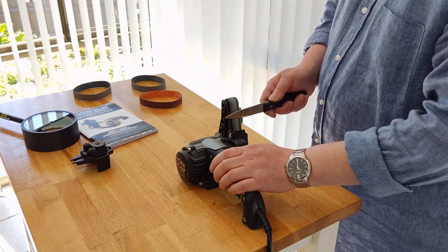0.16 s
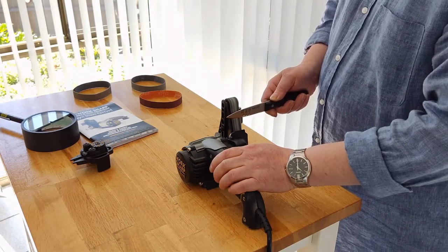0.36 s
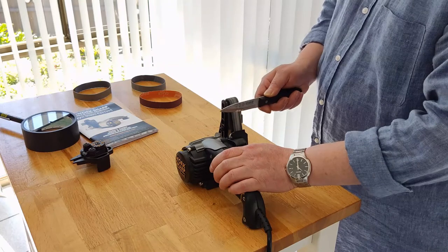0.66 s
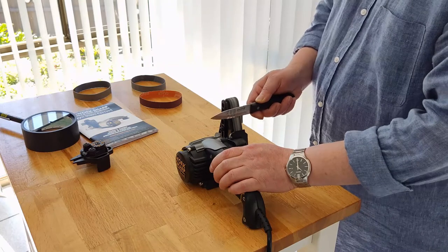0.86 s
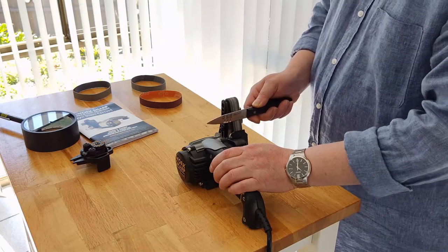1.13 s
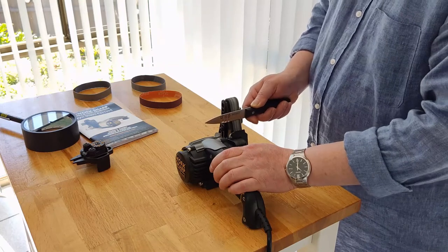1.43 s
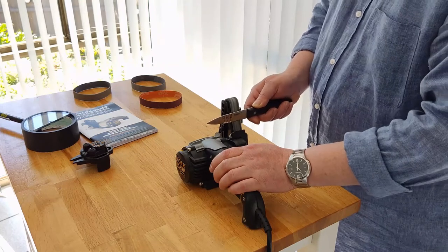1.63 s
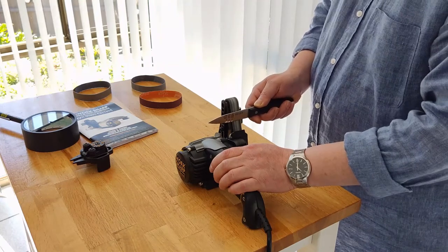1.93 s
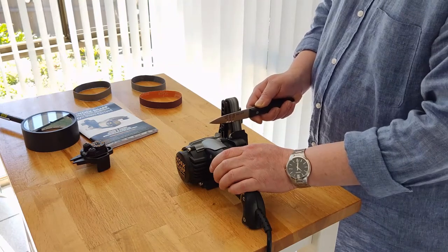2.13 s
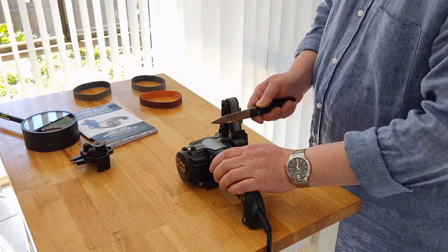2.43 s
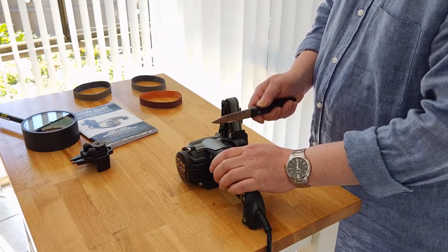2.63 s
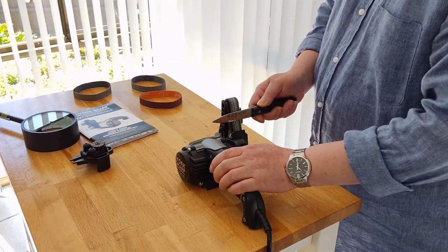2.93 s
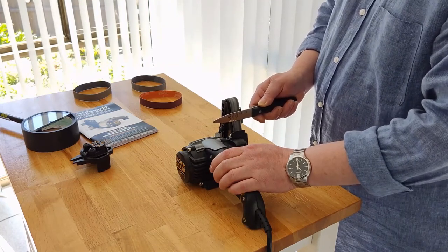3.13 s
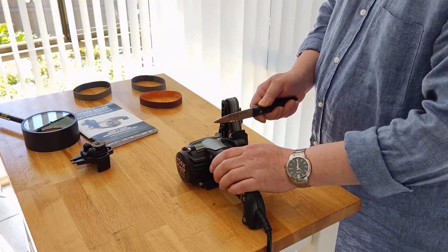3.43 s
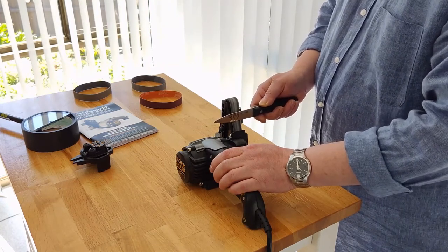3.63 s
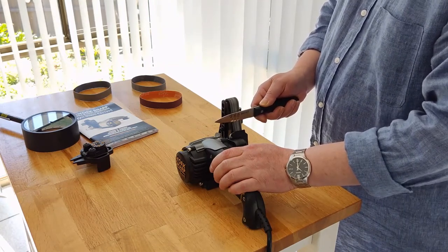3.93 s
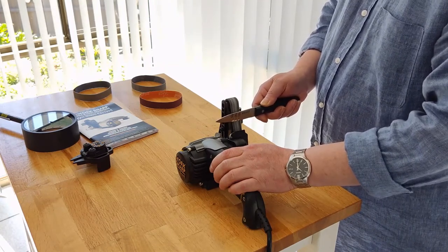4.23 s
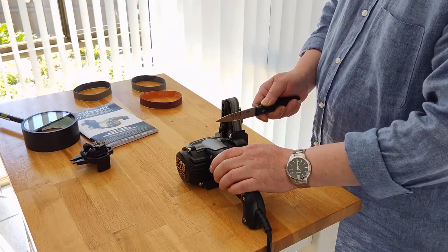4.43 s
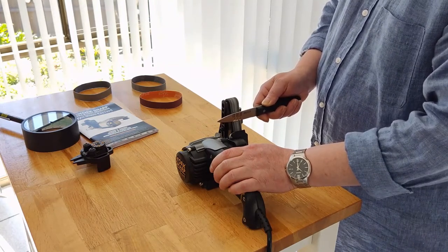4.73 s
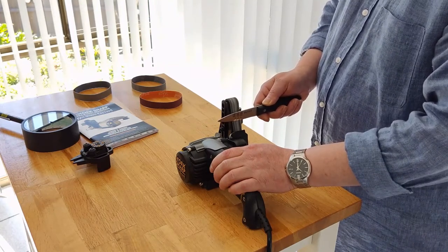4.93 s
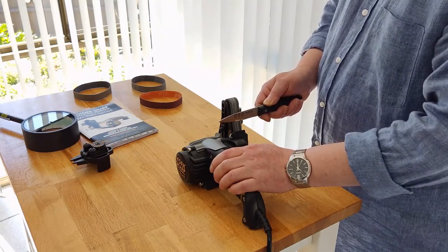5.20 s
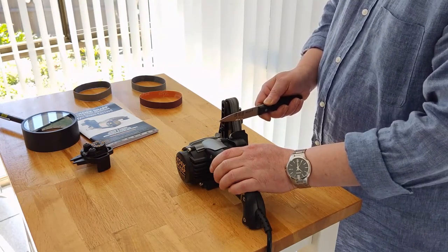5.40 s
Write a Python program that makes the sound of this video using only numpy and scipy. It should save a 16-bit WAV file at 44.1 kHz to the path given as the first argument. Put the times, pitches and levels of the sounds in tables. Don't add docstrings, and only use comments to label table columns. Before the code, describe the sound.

A steady low motor hum with a buzzing rattle and thin gear whine runs throughout. Over it, sizzling metallic grinding flutters rapidly with each turn of the belt, stops for a little over half a second, then returns in one long, slightly wavering stroke. Near, dry stereo sound from a small camera on an indoor table.

```python
import sys
import numpy as np
from scipy import signal
from scipy.io import wavfile
from scipy.ndimage import uniform_filter1d, map_coordinates

SR = 44100
rng = np.random.default_rng(int(sys.argv[2]) if len(sys.argv) > 2 else 0)


def gain_from_db(level_db):
    decades = np.asarray(level_db, float) / 20
    return 10 ** decades


def inscribe(sig):
    pcm = np.round(np.clip(np.atleast_2d(sig).T, -1, 1) * 32767)
    wavfile.write(sys.argv[1], SR, pcm.astype(np.int16))


N = 245195
T = np.arange(N) / SR
LAPS_PER_S, START_LAP = 25.321, .0277
KNOCK = .42

# [t/s, duration/s, gained belt rate/(laps per s), gained shaft f/Hz, gained gear f/Hz]
DRAG = [
    (.5, .1, .222, .2, 2),
    (1.3, .38, -.212, -1.5, -2),
    (4.33, .22, -.124, -1.35, -19),
]
# [f/Hz, left minus right level/dB, likeness (0-1)]
PORTS = [(5000, -1, 0), (6230, -3, 0.03), (7000, -3, 1), (8600, -12, 0.77), (9700, -0.5, 1),
         (11000, 16, 0.17), (12500, 8.5, 0.5), (14200, 11.5, .2)]


def grinding():
    # [f/Hz, spectral level/(dB per Hz)]
    grind_spectrum = [(2650, -53), (4580, -28), (5000, -27), (5690, -24), (6140, -19), (6660, -23.5),
                      (7220, -10), (7760, -10), (8180, -3), (9000, -2.5), (10100, -5.5), (11200, -4.5),
                      (12600, -18.5), (14100, -20)]
    # [f/Hz, bandwidth/Hz, level above the hiss/dB]
    blade_modes = [(8380, 35, 5.5), (8830, 50, 2.5), (9000, 40, 5.5), (9080, 40, 3), (9295, 50, 5),
                   (9860, 70, 3), (10270, 40, 3.5), (10570, 70, 3), (10800, 70, 2), (11100, 40, 6),
                   (11400, 35, 4.5), (6290, 80, 3)]
    # [place in the lap (0-1), width/laps, level/dB]
    grind_spots = [(0.05, 0.022, 1.1), (0.55, 0.017, 5.5), (0.605, 0.034, 1.0), (0.655, 0.031, 2.1),
                   (0.72, 0.018, 6.6), (0.775, 0.034, 4.7), (0.84, 0.044, 5.6), (0.93, 0.019, 1.6),
                   (0.965, 0.012, 1.9)]
    pressure, bright_db = hand()
    bite = grit(grind_spots, 1.3, luck_db=1.6, swell_db=.2, fine_db=1.15, most_db=8)
    sound = hiss(pressure * bite, grind_spectrum, PORTS, size=2048, patchy_db=1.8,
                 modes=blade_modes, fickle=.45)

    treble_filter = signal.butter(2, 10100, "high", fs=SR, output="sos")
    treble = signal.sosfiltfilt(treble_filter, sound)
    body = sound - treble
    fizz_filter = signal.butter(4, 12400, "high", fs=SR, output="sos")
    fizz = signal.sosfiltfilt(fizz_filter, treble)
    treble = treble + fizz * (gain_from_db(4.2 * drift(23.85)) - 1)

    rock_db, tremor_db = 1, -0.4
    bright_db = bright_db + rock_db * drift(13)
    tilted = treble * gain_from_db(bright_db / 2) + body / gain_from_db(bright_db / 2)
    return gain_from_db(tremor_db * drift(7)) * tilted


def hand():
    # [touch t/s, lift t/s, grinding level/dB, brightness/dB]
    strokes = [
        (-.6, 0.49, -16.5, 4.5),
        (1.18, 6, -16, 0.9),
    ]
    # [t/s, width/s, level/dB, brightness/dB]
    wavers = [(.3, .16, -2, -6), (.41, .06, -0.5, 10), (1.43, .07, 2, 1), (2.17, 0.094, -1.5, -5),
              (2.75, 0.078, -2, -4), (3.0, 0.25, .5, 5), (3.27, .09, -2.5, -2), (3.45, .1, .5, 3),
              (3.97, .14, -0.1, 0), (4.24, 0.065, .6, 1), (4.72, 0.11, -1.5, -4), (5.4, 0.84, 1.8, 0.5)]
    touch_s, first_bite_db, bear_s, lift_db_per_s = 0.032, -6, 0.23, 220
    ease_db_per_s, dull_db_per_s = 0.68, 0.36

    pressure, bright_db, waver_db = np.zeros(N), np.zeros(N), 0
    for at, width, db, tilt_db in wavers:
        bump = np.exp(-4 * np.log(2) * ((T - at) / width) ** 2)
        waver_db = waver_db + db * bump
        bright_db = bright_db + tilt_db * bump
    for touch, lift, db, tilt_db in strokes:
        since = np.maximum(T - touch, 0)
        db = db + first_bite_db * np.exp(-since / bear_s) - ease_db_per_s * since
        db = db - lift_db_per_s * np.maximum(T - lift, 0)
        pressure += np.minimum(since / touch_s, 1) * gain_from_db(db)
        near_belt = (T > touch) * (T < lift + .3)
        bright_db += (tilt_db - dull_db_per_s * since) * near_belt
    return pressure * gain_from_db(waver_db), bright_db


def grit(spots, depth, luck_db, swell_db, fine_db, most_db):
    lap, place = np.divmod(START_LAP + turns(LAPS_PER_S, axis=2), 1)
    luck = rng.standard_normal((int(lap[-1]) + 1, len(spots)))
    db = swell_db * np.cos(2 * np.pi * (place - .84))
    for k, (at, width, spot_db) in enumerate(spots):
        bite_db = depth * spot_db + luck_db * luck[lap.astype(int), k]
        db = db + bite_db * np.exp(-4 * np.log(2) * ((place - at) / width) ** 2)
    fine_grit = uniform_filter1d(uniform_filter1d(rng.standard_normal(N), 24), 24)
    db = db + fine_db * evened(fine_grit)
    return evened(gain_from_db(most_db * np.tanh(db / most_db)))


def free_belt():
    # [f/Hz, spectral level/(dB per Hz)]
    free_spectrum = [(2650, -32.5), (4580, -10), (4880, -17.5), (6030, -15.5), (6200, -5.5), (6600, -8),
                     (7030, -2), (7230, -10), (7620, -2.5), (8760, 4.5), (10100, -2), (11200, 3),
                     (14200, -14.5)]
    # [place in the lap (0-1), width/laps, level/dB]
    free_spots = [(0.225, 0.042, 3.0), (0.265, 0.009, 1.4), (0.31, 0.02, 5.5), (0.39, 0.017, 1.5),
                  (0.46, 0.012, 2.4), (0.54, 0.022, 3.1), (0.57, 0.015, 2.3), (0.76, 0.036, 1.7),
                  (0.84, 0.043, 2.9)]
    bite = grit(free_spots, .9, luck_db=1.5, swell_db=.3, fine_db=1.2, most_db=6)
    return gain_from_db(-26.5) * hiss(bite, free_spectrum, PORTS, patchy_db=.6)


def belt_joint():
    # [multiple of the lap rate, level midway/dB, creep/(dB per s)]
    joint_tones = [(11, -68, 0), (12, -64, -.8), (16, -66.5, 0), (19, -53, 1.1), (20, -62, .4),
                   (22, -57.5, 0), (23, -59.5, 0), (24, -66, .4), (25, -53, -.6), (26, -55, -.6),
                   (27, -47.2, .5), (29, -58.5, .6), (30, -53.5, 0), (31, -47.5, .2), (33, -46.3, .6),
                   (34, -43.5, -.6), (35, -51.5, .8), (36, -51, -.3), (37, -54, 1.2), (39, -59.5, 1.9),
                   (41, -54, 0), (48, -62, -.4), (51, -63, 2.4), (54, -63, .8), (56, -60, 2.4)]
    since_knock = START_LAP + turns(LAPS_PER_S, axis=2) - KNOCK
    return sum(tone(k * since_knock, joint_db(k, db, creep_db) + .7, .015, 1, apart=.0024 * k, scatter=.62)
               for k, db, creep_db in joint_tones)


def joint_db(multiple, db, creep_db):
    # [multiple of the lap rate, t/s, level step/dB]
    shifts = [
        (26, .5, -10),
        (25, 1.3, -8),
        (23, 4.33, 8),
    ]
    steps_db = sum(step_db * np.clip((T - at) / .15, 0, 1) for k, at, step_db in shifts if k == multiple)
    midway_s = 2.8
    return db + creep_db * (T - midway_s) + steps_db


def shaft_and_gear():
    # [multiple of the shaft rate, level/dB, phase wander/turns]
    shaft_tones = [(1, -53.5, 0.014), (2, -58.5, 0.036)]
    # [multiple of the mesh rate, level/dB, phase wander/turns]
    gear_tones = [(1, -46.8, .17), (2, -53, .2)]
    shaft_turns, gear_turns = turns(175.6, axis=3), turns(2103, axis=4)
    hush_db = -3 * (T > DRAG[-1][0])
    shaft = sum(tone(k * shaft_turns, db, wander, wobble_db=-1.4, apart=0.074)
                for k, db, wander in shaft_tones)
    gear = sum(tone(k * gear_turns, db + hush_db, wander, wobble_db=1.5, wander_hz=36.02)
               for k, db, wander in gear_tones)
    return shaft + gear


def loose_rollers():
    # [f/Hz, level/dB, bandwidth/Hz]
    roller_tones = [(66.5, -60, 4.6), (108.6, -64.5, 4.4), (151.4, -64, 2.56), (238.9, -59, 2.04),
                    (1044, -51.5, 30)]
    return sum(tone(hz * T, db, 0.17, wobble_db=3.5, wander_hz=width, apart=0.027)
               for hz, db, width in roller_tones)


def housing():
    # [f/Hz, spectral level/(dB per Hz)]
    rumble_spectrum = [(12, -45), (24, -13), (120, -20.5), (172, -18.5), (392, -18.5), (476, -13),
                       (622, -15.5), (851, -2.5), (984, -8), (1520, -14), (2140, -13), (3910, -17),
                       (4400, -21), (4980, -19.5), (6500, -16), (8450, -49), (14300, -120)]
    # [f/Hz, bandwidth/Hz, level relative to the rumble/dB]
    housing_modes = [(4150, 160, 6), (4620, 130, 5.5), (2256, 110, 3.5), (890, 69, 2), (5300, 130, 3),
                     (38, 14, -6), (195, 19, -8), (51.7, 11, 7.5), (667.5, 26, 12.5), (3160, 57, 2.5),
                     (820, 15, 2.5), (655, 15, -11), (81, 12, 4.5), (502, 13, -16), (960, 22, -5),
                     (135, 20, -4)]
    # [f/Hz, left minus right level/dB, likeness (0-1)]
    housing_ports = [(40, 1, 0.36), (100, -5, 0.97), (270, 1.5, 1), (720, -1.5, 0.49), (1200, -0.5, 0.28),
                     (2000, 1, .32), (3200, -0.5, 0.21), (6000, -6, 0.02)]
    laps = START_LAP + turns(LAPS_PER_S, axis=2)
    throb = gain_from_db(0.83 * np.cos(2 * np.pi * (laps - KNOCK)))
    return gain_from_db(-34) * hiss(throb, rumble_spectrum, housing_ports, size=4096, patchy_db=2.0,
                           modes=housing_modes)


def machine():
    out = belt_joint() + shaft_and_gear() + loose_rollers() + housing()
    return np.array([np.roll(out[0], 2), out[1]])


def turns(per_s, axis):
    gained = sum(row[axis] * np.clip((T - row[0]) / row[1], 0, 1) for row in DRAG)
    return np.cumsum(per_s + gained) / SR


def tone(turned, db, wander, wobble_db, wander_hz=6, apart=0.048, scatter=1):
    shared = turned + scatter * rng.random() + wander * drift(wander_hz)
    split = apart * drift(3.01) / 2
    level = gain_from_db(db + wobble_db * drift(8))
    return np.sqrt(2) * level * np.sin(2 * np.pi * np.array([shared + split, shared - split]))


def hiss(gain, spectrum, ports, size=512, patchy_db=2.5, modes=(), fickle=0):
    overlap = 3 * size // 4
    hz, _, z = signal.stft(gain * rng.standard_normal((2, N)), SR, nperseg=size, noverlap=overlap)
    patches = uniform_filter1d(uniform_filter1d(rng.standard_normal(z[0].shape), 5, 0), 24, 1)
    colour_db = read(spectrum, hz)[:, None]
    for f, width, db in modes:
        presence = np.clip(1 + fickle * drift(1.76)[::size // 4], 0, 2)
        resonance_db = db / (1 + (2 * (hz - f) / width) ** 2)
        colour_db = colour_db + np.outer(resonance_db, np.resize(presence, z.shape[2]))

    same = np.clip(read(ports, hz, axis=2), 0, 1)[:, None]
    lean = gain_from_db(read(ports, hz) / 2)[:, None]
    left = z[0] * lean
    right = (same * z[0] + np.sqrt(1 - same ** 2) * z[1]) / lean
    pair = np.array([left, right])
    pair /= np.sqrt(lean ** 2 + lean ** -2. + 2 * same) / 2
    pair *= gain_from_db(colour_db + patchy_db * evened(patches))
    out = signal.istft(pair, SR, nperseg=size, noverlap=overlap)[1][:, :N]
    return out / np.sqrt(np.mean(out.mean(0) ** 2) / np.mean(gain ** 2))


def drift(hz):
    knots = rng.standard_normal(4000)
    return evened(map_coordinates(knots, [T[::64] * hz + 2], order=3).repeat(64)[:N])


def read(points, hz, axis=1):
    table = np.array(points)
    return np.interp(np.log(hz + 1), np.log(table[:, 0] + 1), table[:, axis])


def evened(x):
    return x / np.sqrt(np.mean(x ** 2) + 1e-20)


def scene():
    return grinding() + free_belt() + machine()


def roll_off(x):
    return signal.sosfilt(signal.butter(12, 14240, fs=SR, output="sos"), x)


def record(dry):
    over = np.maximum(abs(dry) - .6, 0)
    rounded = dry - np.sign(dry) * (over - .3 * np.tanh(over / .3))
    return roll_off(rounded)


dry = scene()
out = record(dry)
inscribe(out)
```